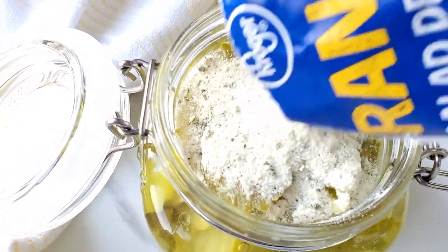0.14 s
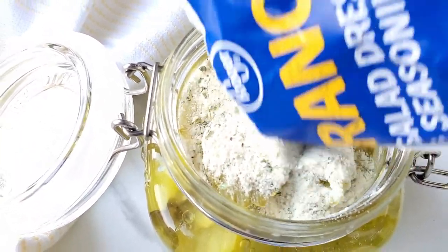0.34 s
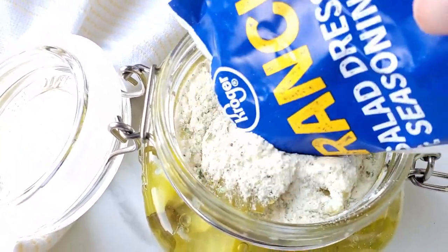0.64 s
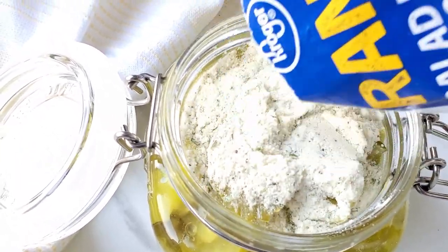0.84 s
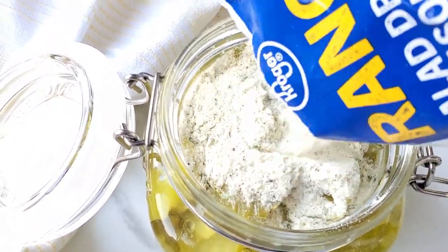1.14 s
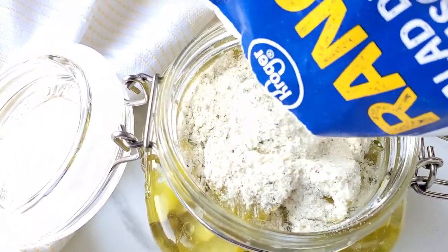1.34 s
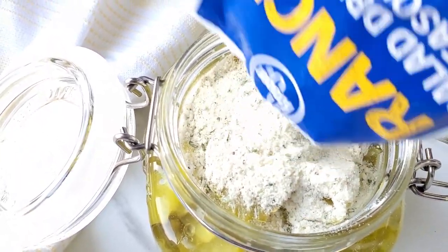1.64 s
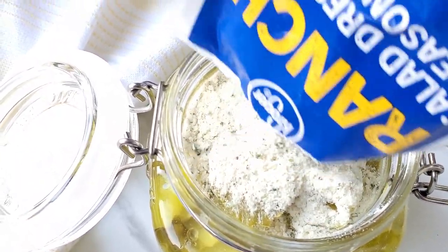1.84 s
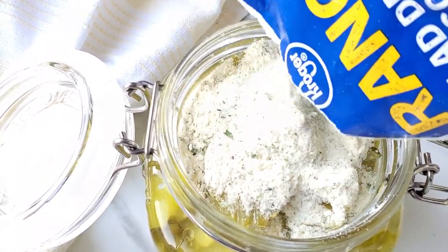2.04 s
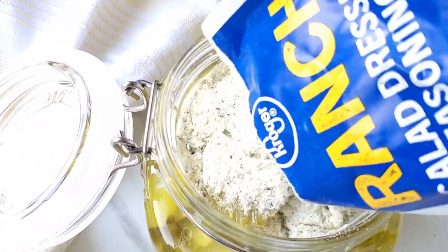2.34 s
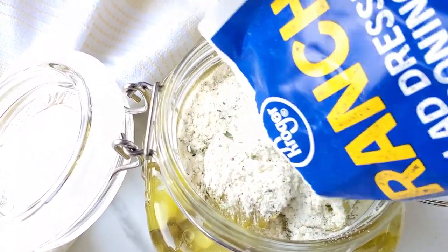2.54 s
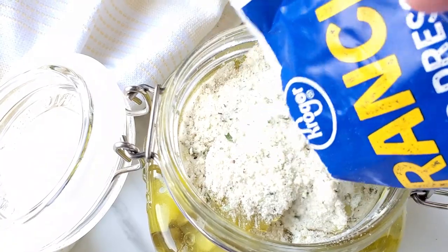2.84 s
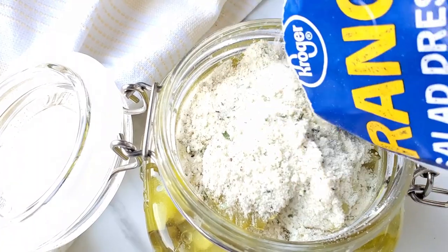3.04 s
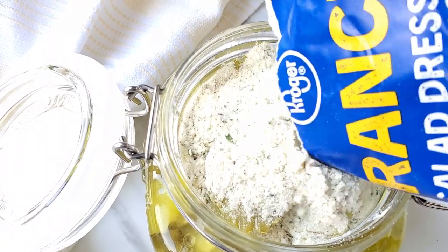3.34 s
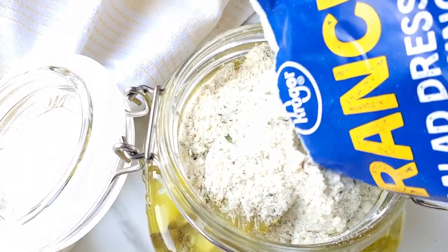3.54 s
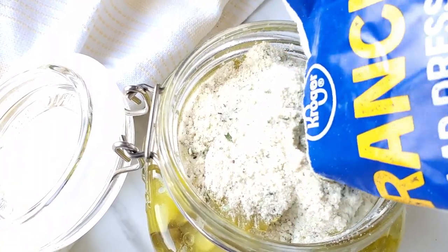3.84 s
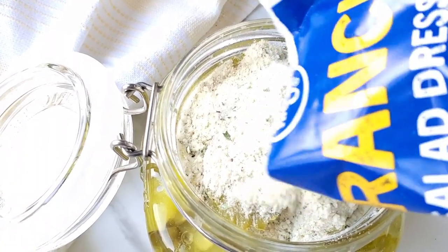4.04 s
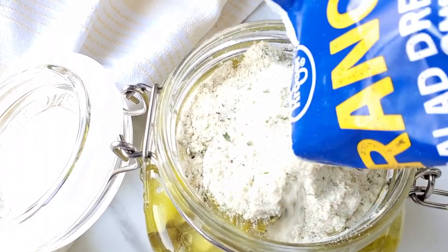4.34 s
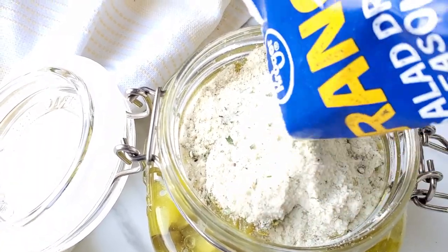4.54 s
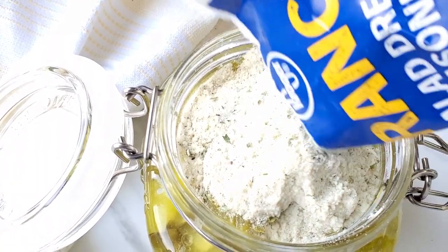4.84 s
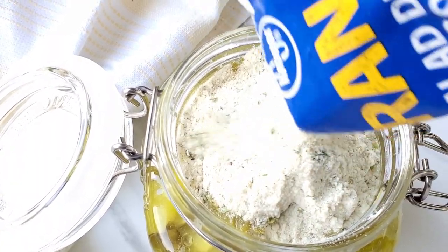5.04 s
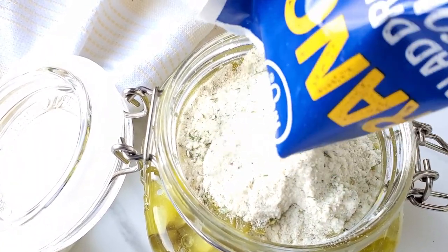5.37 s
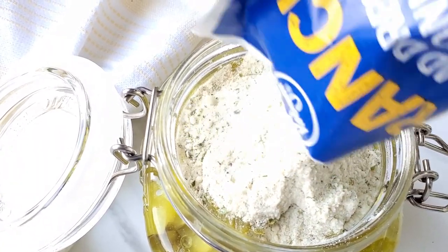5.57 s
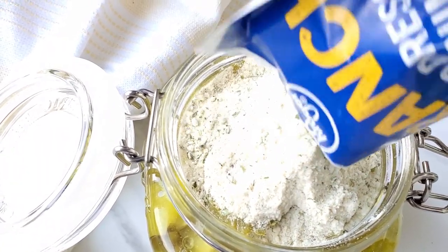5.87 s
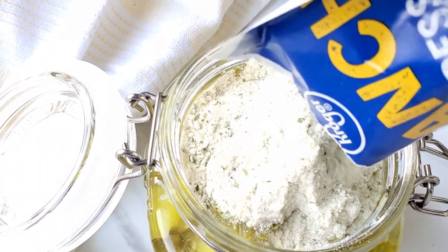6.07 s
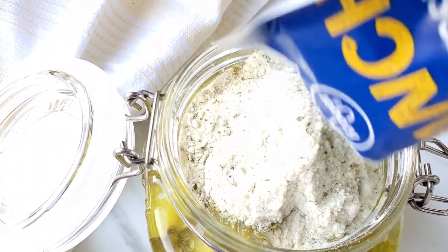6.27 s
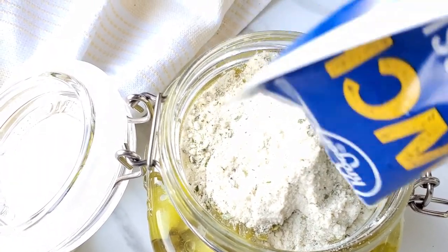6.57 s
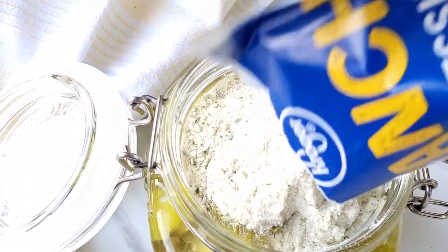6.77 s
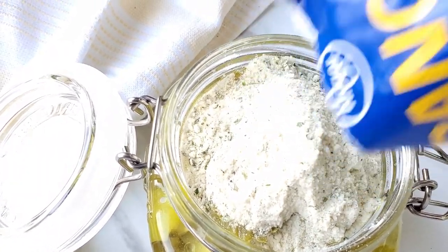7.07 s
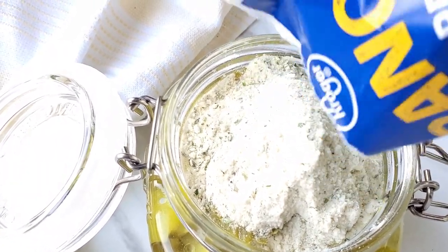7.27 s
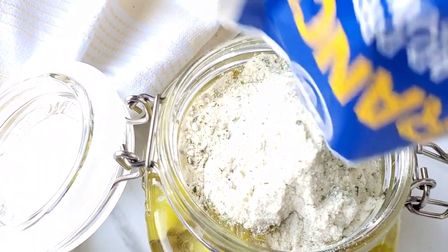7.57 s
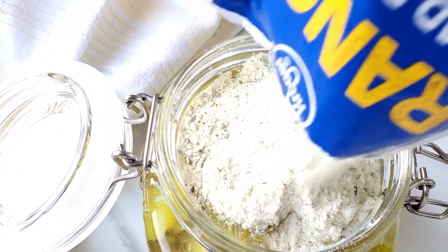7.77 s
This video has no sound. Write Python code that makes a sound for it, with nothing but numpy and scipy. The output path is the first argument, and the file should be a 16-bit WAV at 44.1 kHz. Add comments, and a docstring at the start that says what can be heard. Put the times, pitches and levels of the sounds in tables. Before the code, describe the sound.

A foil packet crinkles and ticks close by as fine dry powder slides out in soft hissing surges, in a quiet kitchen with faint appliance hum.

```python
"""In a small kitchen, a foil seasoning packet is tipped, squeezed and shaken over a glass jar.
Powder slides down the foil in hissing surges of random grains, with coarser herb flakes pinging on top.
The packet walls rub and scuff, and creases snap over with dry ticks: noise bursts through resonances.
A flipping panel adds a hollow thump, and a gripping finger creaks along in runs of knocks.
Appliances hum far behind as wavering sines over shaped noise."""
import sys
import numpy as np
from scipy import signal
from scipy.io import wavfile

SR = 44100
rng = np.random.default_rng(int(sys.argv[2]) if len(sys.argv) > 2 else 0)


def digitize_waveform(pressure):
    """Quantize a signal to 16-bit integers and store it at the path in sys.argv[1].

    Rows of a 2-D input are taken as channels; values are limited to [-1, 1].
    """
    field = np.atleast_2d(pressure).T
    bounded = np.clip(field, -1, 1)
    quanta = np.round(bounded * 32767).astype(np.int16)
    wavfile.write(sys.argv[1], SR, quanta)


N = 348734
TIME = np.arange(N) / SR
NO_DENORMALS = 1e-18   # inaudible offset that keeps decaying filters fast


def from_db(db):
    """Decibels to gain."""
    return 10 ** (np.asarray(db) / 20)


def rms_one(x):
    """Scale to rms 1."""
    return x / np.sqrt(np.mean(x ** 2) + 1e-20)


def at_hz(points, hz):
    """Read a table on a log-frequency axis."""
    f, value = np.transpose(points)
    return np.interp(np.log(hz), np.log(f), value)


def band(x, low_hz, high_hz, order=2):
    """Butterworth band-pass."""
    edges = [low_hz, min(high_hz, SR / 2 - 500)]
    return signal.sosfilt(signal.butter(order, edges, "band", fs=SR, output="sos"), x)


def resonate(x, hz, width_hz):
    """One resonance with gain 1 on top."""
    r = np.exp(-np.pi * width_hz / SR)
    feedback = [1, -2 * r * np.cos(2 * np.pi * hz / SR), r * r]
    return signal.lfilter(np.array([1, 0, -1]) * (1 - r * r) / 2, feedback, x)


def drift(rate):
    """Random wander of rms 1, heading for a new value `rate` times per second."""
    knots = rng.standard_normal(N // 20)
    return rms_one(np.interp(TIME * rate, np.arange(len(knots)), knots))


def pan(lean_db):
    """Left and right gains of mean power 1; a negative lean is louder on the right."""
    return rms_one(from_db([[lean_db / 2], [-lean_db / 2]]))


def grains(per_s, spread_db):
    """Random clicks of very uneven size, rms 1."""
    sizes = from_db(spread_db * np.minimum(rng.exponential(1, N), 4))
    struck = rng.random(N) < per_s / SR
    return rms_one(struck * sizes * rng.choice([-1, 1], N))


def colour(draw, spectrum, likeness, lean, patchy_db, low_hz):
    """Shape an excitation in roughly half-octave stereo bands, each flickering on its own; rms 1."""
    edges = np.geomspace(low_hz, 18000, int(2 * np.log2(18000 / low_hz)) + 1)
    sources = [np.array([draw(), draw()]) for _ in range(2)]
    out = 0
    for k, (low, high) in enumerate(zip(edges, edges[1:])):
        mid, side = band(sources[k % 2], low, high)   # neighbouring bands use different sources
        hz = np.sqrt(low * high)
        alike = np.clip(at_hz(likeness, hz), 0, 1)
        gain = from_db(at_hz(spectrum, hz) + patchy_db * drift(40))
        stereo = np.sqrt(1 + alike) * mid + np.sqrt(1 - alike) * side * [[1], [-1]]
        out = out + gain * pan(at_hz(lean, hz)) * stereo
    return rms_one(out)


def jolt(t, decay_s, scatter, apart):
    """One sharp click, then a dying scatter as the bend runs through the sheet; partly different on each side."""
    noise = rng.standard_normal((3, len(t))) * np.exp(-t / decay_s)
    noise /= np.linalg.norm(noise, axis=1, keepdims=True)
    return scatter * (noise[0] + apart * noise[1:]) - (t == 0)


def add(out, s, wave, level_db, lean_db):
    """Lay a short sound into the mix; its level is that of its energy spread over 10 ms."""
    at = round(s * SR)
    unit = rms_one(wave) * np.sqrt(.01 * SR / wave.shape[1])
    out[:, at:at + wave.shape[1]] += (from_db(level_db) * pan(lean_db) * unit)[:, :N - at]


def swells(rows, rise_db_per_s, fall_db_per_s, rest_db):
    """Gain at every sample: each row (s, length s, dB, swell dB) rises, holds while it swells, and dies away."""
    t = TIME[::16]
    level_db = np.full(len(t), float(rest_db))
    for s, length_s, db, swell_db in rows:
        hold_db = db + swell_db * (np.clip((t - s) / length_s, 0, 1) - .5)
        before_db = rise_db_per_s * np.maximum(s - t, 0)
        after_db = fall_db_per_s * np.maximum(t - s - length_s, 0)
        level_db = np.maximum(level_db, hold_db - before_db - after_db)
    return np.interp(TIME, t, from_db(level_db))


# colour of the still room: (frequency [Hz], relative density [dB per Hz])
ROOM_COLOUR = [(20, -11.5), (45, 1.5), (70, 1), (125, -4), (200, -8.5), (300, -17.5), (430, -18),
               (600, -22.5), (1200, -25), (2400, -38.5), (4000, -39), (8000, -57.5), (16000, -41)]
# how alike the room is in the two channels: (frequency [Hz], likeness [0-1])
ROOM_LIKENESS = [(40, 0.8), (130, 0.86), (300, 0.7), (700, 0.17), (2000, 0), (16000, 0.17)]
# appliance hum: (frequency [Hz], typical level [dB rms])
APPLIANCE_HUM = [(59.3, -60.5), (99.6, -62.5), (112, -66.5), (124, -66), (149, -74), (199, -82.5)]


def room_tone(level_db=-56.5, waver_db=1.0):
    """Low rumble and thin hiss of the room, with the hum of motors wavering in level and phase."""
    room_lean = [(50, 0.55), (1000, 0)]   # (frequency [Hz], left-right [dB])
    air = colour(lambda: rng.standard_normal(N), ROOM_COLOUR, ROOM_LIKENESS, room_lean,
                 patchy_db=1.35, low_hz=20.93)
    hum = 0
    for hz, db in APPLIANCE_HUM:
        strength = from_db(db + waver_db * drift(3.2)) * np.sqrt(2)
        hum = hum + strength * np.sin(2 * np.pi * hz * TIME + 0.77 * drift(1.967))
    return from_db(level_db) * band(air, 34, 20000, order=3) + hum


# each tilt or squeeze slides powder and rubs the walls together; levels before each layer's trim:
# (start [s], length [s], powder level [dB], rubbing level [dB], swell from start to end [dB])
MOVES = [(0.194, 0.019, -56, -57, -2), (0.247, 0.021, -55.5, -54, 9), (0.314, 0.086, -46.5, -52.5, 11),
         (0.512, 0.063, -53.5, -52.5, -3.5), (0.619, 0.17, -52.5, -78, 6), (0.856, 0.036, -51, -75, 4),
         (1.052, 0.15, -47.5, -58.5, 2.5), (1.288, 0.081, -50, -62, -1), (1.689, 0.038, -53, -68, 12.5),
         (1.809, .2, -39, -49.5, 1.5), (2.167, 0.019, -58.5, -65, -2), (2.21, 0.081, -73, -61, -1),
         (2.294, 0.14, -57.5, -51.5, -8), (2.444, .12, -46.5, -50.5, 1), (2.592, .1, -54, -52, -6),
         (2.737, 0.1, -60, -62, -2), (2.899, 0.066, -51, -47, -9), (3.021, 0.24, -60, -58.5, 1),
         (3.273, 0.17, -63.5, -57, 10), (3.496, 0.045, -54, -36.5, 2), (3.567, 0.23, -64.5, -61.5, 5),
         (3.918, 0.083, -66.5, -57.5, -9), (4.022, 0.065, -53.5, -52.5, 3), (4.142, 0.37, -56.5, -56, 0.5),
         (4.571, 0.11, -49.5, -57, 2), (4.722, 0.16, -61.5, -58, 5), (4.907, 0.074, -51, -51.5, 0.5),
         (5.1, 0.082, -58, -57, -10), (5.21, 0.073, -57, -47.5, -11.5), (5.29, 0.18, -58, -73, -5),
         (5.557, 0.058, -72, -58.5, 4), (5.75, 0.14, -55.5, -61, -4), (5.898, 0.057, -47.5, -55, -2),
         (5.993, 0.089, -60, -61, -6), (6.133, 0.049, -62, -65.5, -4), (6.535, 0.167, -67.5, -59, -2),
         (6.8, 0.038, -72, -60.5, -1), (6.975, 0.024, -74, -57.5, 5), (7.036, 0.045, -66, -53.5, -1.5),
         (7.343, 0.051, -60, -48.5, 2), (7.44, 0.014, -66, -46, -16), (7.524, 0.054, -53, -72, 2),
         (7.613, 0.077, -52.5, -72, 13), (7.726, 0.031, -43.5, -54.5, -2.5), (7.88, .03, -69, -76, -2)]


def flow():
    """How much powder slides: it gets going and comes to rest steeply, and trickles while held still."""
    rows = [(s, length, db, swell) for s, length, db, _, swell in MOVES]
    return swells(rows, rise_db_per_s=694, fall_db_per_s=444, rest_db=-75.5)


def friction():
    """How hard the walls rub, down to a faint rustle while the packet is held still."""
    rows = [(s, length, db, swell) for s, length, _, db, swell in MOVES]
    return swells(rows, rise_db_per_s=900, fall_db_per_s=484, rest_db=-72.5)


# the air in the packet's mouth rings lower the wider it gapes: (time [s], centre frequency [Hz])
MOUTH_PITCH = [(0, 3300), (.45, 3240), (.95, 2290), (1.1, 3170), (1.4, 2950), (1.9, 2470), (2.7, 2570),
               (3.2, 2250), (3.9, 2220), (4.3, 2000), (4.8, 1780), (5.3, 1830), (6.5, 1940), (7.0, 2200),
               (7.9, 2080)]


def mouth(x, width_hz):
    """A resonance whose centre follows the opening of the packet; gain 1 on top."""
    s, hz = np.transpose(MOUTH_PITCH)
    turn = np.exp(2j * np.pi * np.cumsum(np.interp(TIME, s, hz)) / SR)
    r = np.exp(-np.pi * width_hz / SR)
    # shift the moving centre down to 0 Hz, smooth there, and shift back
    smoothed = signal.lfilter([1 - r], [1, -r], x / turn + NO_DENORMALS)
    return 2 * np.real(turn * smoothed)


# colour of the sliding powder before the mouth rings: (frequency [Hz], relative density [dB per Hz])
POWDER_COLOUR = [(150, -34.5), (400, -17), (800, -4), (1500, 8), (2200, -5.5), (3000, 2.5), (4500, 8.5),
                 (7000, 8), (10000, 3.5), (13000, 29), (16000, 4.5)]
# how alike powder and foil are in the two channels: (frequency [Hz], likeness [0-1])
LIKENESS = [(60, .95), (300, 0.9), (1000, 0.74), (2200, 0.5), (4500, 0), (9000, 0), (16000, 0.6)]
# the packet lies to the right: (frequency [Hz], left-right [dB])
LEAN = [(150, 20), (400, -3), (700, -23), (1300, -0.5), (2400, -3), (4500, -5.5), (8000, -6.5), (15000, -8)]


def powder(level_db=-4.0):
    """Countless fine grains skid over the foil and stir the air in the mouth; the flow comes in small clumps."""
    hiss = colour(lambda: grains(per_s=14000, spread_db=3.5), POWDER_COLOUR, LIKENESS, LEAN,
                  patchy_db=2.0, low_hz=129.6)
    hiss = hiss + 2.34 * mouth(hiss, width_hz=1200)
    clumps = from_db(level_db + 2.2 * drift(130))
    return flow() * clumps * rms_one(hiss)


def flakes(per_s=200, cycles=52.0, level_db=-11.5, count=36):
    """Coarser herb flakes ride on the powder; each pings a small facet of foil at one of `count` pitches."""
    hits = grains(per_s, spread_db=3.5)
    dealt = rng.integers(0, count, N)
    out = 0
    for k, hz in enumerate(np.geomspace(2500, 9000, count)):
        ping = resonate(hits * (dealt == k) + NO_DENORMALS, hz, hz / cycles)
        out = out + ping / hz ** 0.64 * pan(at_hz(LEAN, hz))   # higher pings are held back
    return flow() * from_db(level_db) * rms_one(out)


# colour of the rubbing foil before its resonances: (frequency [Hz], relative density [dB per Hz])
FOIL_COLOUR = [(150, -28), (400, 4.5), (700, 0.5), (1200, 10.5), (1700, -1), (2300, 7), (3200, 6),
               (4500, -12), (6500, -4.5), (10000, -13.5), (16000, -37)]


def rubbing(level_db=-2.5):
    """Tiny slips and wrinkles tick in the foil and set the mouth ringing."""
    rustle = colour(lambda: grains(per_s=1500, spread_db=2.0), FOIL_COLOUR, LIKENESS, LEAN,
                    patchy_db=4.5, low_hz=140.94)
    rustle = rustle + 1.5 * mouth(rustle, width_hz=200) + .9 * resonate(rustle, 5000, width_hz=1500)
    flutter = from_db(level_db + 1.4 * drift(90))
    return friction() * flutter * rms_one(rustle)


def wrinkles(per_s=70, cycles=3.6, level_db=-11.0, count=12):
    """Small creases give way at random while the walls rub, each with a short ring at one of `count` pitches."""
    hits = grains(per_s, spread_db=3.5)
    dealt = rng.integers(0, count, N)
    ticks = 0
    for k, hz in enumerate(np.geomspace(1500, 5200, count)):
        tick = resonate(hits * (dealt == k) + NO_DENORMALS, hz, hz / cycles)
        ticks = ticks + tick / hz ** 1.2   # higher ticks are held back
    return friction() * from_db(level_db) * rms_one(ticks) * pan(lean_db=-10.5)


def fold_crack(t, decay_s):
    """The bright crack right at a fold."""
    crack = band(jolt(t, decay_s, scatter=1.0, apart=0.74), 2700, 13100)
    return crack + 1.17 * resonate(crack, 5480, width_hz=2000)


# creases snapping over: (time [s], ring level [dB], ring pitch [Hz],
# panel thump re ring [dB], crack re ring [dB])
SNAPS = [(0.1609, -57.5, 2280, -6, -11), (0.269, -58.5, 2950, -10, 5), (0.408, -47.5, 2670, -11, -16),
         (0.53, -41.5, 3550, -24, -5), (0.5342, -45, 2640, -12, -6), (0.5483, -33.5, 1500, -6.5, -22),
         (0.757, -62, 2570, 8, 7), (0.8773, -43, 2160, -4.5, -6), (0.9951, -37.5, 1960, -5, -38),
         (1.1056, -47.5, 1880, -9.5, -12), (1.181, -50, 3030, -20, 1), (1.2843, -52, 1420, -13, -8),
         (1.365, -52.5, 3040, -26, 3), (1.486, -58, 2800, -20, -7.5), (1.536, -62, 3500, -13, 1),
         (1.634, -66.5, 3600, -17, 0), (1.7677, -53.5, 2790, -21, -5), (1.9413, -44, 2180, -24, -7),
         (2.004, -40.5, 2430, -15, -12), (2.3062, -47, 1820, -13, -27), (2.4, -54, 2840, -28, 7),
         (2.487, -47.5, 2810, 1.5, -4), (2.5251, -39, 1780, -13.5, -22), (2.6657, -41, 2200, -10.5, -15),
         (2.8296, -43, 1580, 0.5, -15), (2.8792, -37, 2750, -12, -32), (2.8928, -31.5, 2610, -11, -18),
         (2.9003, -46, 2480, -9, -20), (2.9206, -37, 2260, -11.5, -27), (3.0631, -34.5, 2330, -11, -25),
         (3.1033, -35.5, 2240, -14.5, -26), (3.116, -56, 3400, 0, -3), (3.148, -39.5, 2030, -6.5, -31),
         (3.162, -46, 2130, -15, -20), (3.2081, -53.5, 2170, -8, 5.5), (3.2411, -45.5, 1610, -11, -18),
         (3.361, -40, 2090, -6.5, -31), (3.5032, -28.5, 2800, -3, -9), (3.519, -44.5, 1890, 6, -14),
         (3.5286, -33, 2130, -13, -25), (3.534, -30.5, 2760, -22, -6), (3.5464, -31.5, 1980, -14, -14),
         (3.6836, -53.5, 1730, -1.5, -28), (3.7654, -47, 2100, 1.5, -25), (3.8458, -59, 2430, -6, -5.5),
         (3.9346, -38.5, 1910, -11, -35), (4.0407, -46, 1520, 2.5, -10), (4.0462, -33.5, 2700, -18.5, -20),
         (4.086, -55.5, 1220, 9, -9), (4.7271, -51.5, 1700, -7, -13), (4.8238, -41.5, 1640, -7.5, -19.5),
         (4.9257, -50.5, 1710, -5, -5), (5.1013, -34, 2040, 1, -1.5), (5.1076, -31, 1880, -6.5, -22),
         (5.1219, -43, 1460, -7, -20), (5.2305, -37, 2050, -4, -30), (5.3011, -33.5, 1950, -5, -8.5),
         (5.5609, -55.5, 2690, -16, -7.5), (5.5886, -50, 1550, -10, -22), (5.691, -47, 1530, -7.5, -18.5),
         (5.758, -53, 1690, -2, -26), (6.0152, -43.5, 1620, -2.5, -22), (6.122, -55.5, 1660, 7, -4),
         (6.3204, -56.5, 1600, -2, -4), (6.3311, -52, 2200, -8, -4), (6.36, -62, 1800, 2, 7),
         (6.3705, -50, 1670, -8, -22), (6.5427, -40.5, 1560, -0.5, -8.5), (6.5708, -55.5, 2230, 6, -1),
         (6.587, -56, 2020, 7, -4), (6.6211, -54.5, 2650, 5.5, -12), (6.677, -55.5, 1900, 2, -3),
         (6.8171, -45.5, 1520, -3, -29), (7.0285, -52.5, 2230, -9, -14), (7.0554, -49, 1840, -4, -24),
         (7.35, -51.5, 2200, -2, -5), (7.3737, -44, 1650, -6.5, -15), (7.387, -56, 2300, -13, -6),
         (7.3985, -50, 4280, -8, -27), (7.434, -43, 1490, -1, -17), (7.4393, -36.5, 1300, -9.5, -9)]
SNAP_DECAY_S, SNAP_REFERENCE_DB = 0.0017, -29.5   # base decay of a snap at the reference level
SNAP_DOUBLING_DB = 31   # a snap this much weaker takes twice as long to give way


def snaps():
    """Each crease rings its facet, cracks at the fold and pushes air with the panel around it."""
    out, t = np.zeros((2, N)), np.arange(SR // 20) / SR
    for s, level_db, hz, thump, crack in SNAPS:
        slowness = 2 ** ((SNAP_REFERENCE_DB - level_db) / SNAP_DOUBLING_DB)
        decay_s = SNAP_DECAY_S * slowness
        scatter = 2.7 * slowness   # a slow crease gives way in many small steps
        facet = band(jolt(t, decay_s * 1.13, scatter, apart=1.0), hz * 0.47, hz * 1.585, order=3)
        facet = facet + 1.38 * resonate(facet, hz, width_hz=440) + 0.84 * resonate(facet, 2320, width_hz=110)
        own_hz = hz * rng.uniform(0.43, 1.562)   # every facet has one sharper note of its own
        facet = facet + 1.97 * resonate(facet, own_hz, width_hz=220)
        panel = band(jolt(t, decay_s * 1.35, 0.3 * scatter, apart=0.2), 243, 880)
        panel = panel + 1.5 * resonate(panel, 711, width_hz=81)   # the hollow of the packet
        add(out, s, facet, level_db, lean_db=-5.5)
        add(out, s, panel, level_db + thump, lean_db=-11.5)
        add(out, s, fold_crack(t, decay_s), level_db + crack, lean_db=-9.0)
    return out


# soft scuffs of the packet against fingers and powder heap:
# (time of the middle [s], half length [s], level at the middle [dB], pitch [Hz])
SCUFFS = [(0.565, 0.011, -46.5, 830), (1.821, 0.0075, -45, 372), (2.285, 0.031, -52.5, 574),
          (3.05, 0.25, -61, 573), (3.22, 0.028, -61, 547), (3.271, 0.0051, -44.5, 750),
          (3.508, 0.0026, -32, 796), (3.418, 0.042, -61, 510), (3.688, 0.0077, -48.5, 480),
          (4.637, 0.048, -56.5, 811), (6.59, 0.045, -58, 780), (7.045, 0.028, -62, 520),
          (7.374, 0.042, -59.5, 960)]


def scuffs(lean_db=-9.0):
    """Dull, grainy swells of friction."""
    slip_grains, out = grains(per_s=1300, spread_db=3.5), 0
    for s, half_s, level_db, hz in SCUFFS:
        swell = np.exp(-np.minimum(((TIME - s) / half_s) ** 2, 20))
        dull = rms_one(band(slip_grains, hz * 0.58, hz * 1.09))
        out = out + from_db(level_db) * swell * dull
    return out * pan(lean_db)


# a finger sticks and slips along the packet; level and pitch are centres, before spread and trims:
# (start [s], length [s], slip rate [1/s], thump level [dB], ring re thump [dB], crack re thump [dB],
# hollow pitch [Hz])
CREAKS = [(4.476, .107, 66, -52, -12, -22, 750), (5.0112, .074, 102, -37.5, -10, -21.5, 770),
          (5.1162, .038, 65, -35, -1, -20, 714), (5.1983, .062, 100, -40, -5.5, -15.5, 720)]
SLIP_JITTER_S = .0007   # slips come a little early or late
SLIP_SPREAD_DB, SLIP_PITCH_SPREAD = 1.5, 0.13   # no two slips are alike; pitch spread is a log ratio


def slips():
    """Every creak as a nearly regular run of knocks."""
    rows = []
    for s, length_s, per_s, db, ring, crack, hz in CREAKS:
        for after_s in np.arange(0, length_s, 1 / per_s):
            late, loud, sharp = rng.standard_normal(3)
            slip_s = s + after_s + SLIP_JITTER_S * late
            slip_hz = hz * np.exp(SLIP_PITCH_SPREAD * sharp)
            rows.append((slip_s, db + SLIP_SPREAD_DB * loud, ring, crack, slip_hz))
    return rows


# single taps of a finger on the taut packet, before the trims in knocks():
# (time [s], thump level [dB], ring re thump [dB], crack re thump [dB])
TAPS = [(5.355, -47.5, 3.5, -12), (5.3904, -46, -1.5, -8.5), (5.464, -38, -1, -12.5),
        (5.8951, -40, -1, -19), (5.911, -34, 3, -14), (5.9451, -34, 2.5, -12)]
TAP_HOLLOW_HZ = 718


def knocks(thump_db=1.0, ring_db=-4.5, crack_db=-1.5):
    """A finger lets the whole wall jump: one in-and-out swing of air, a hollow ring and a short rattle of foil."""
    out, t = np.zeros((2, N)), np.arange(SR // 20) / SR
    taps = [(*row, TAP_HOLLOW_HZ) for row in TAPS]
    for s, level_db, ring, crack, hz in taps + slips():
        swing = band(jolt(t, decay_s=0.0038, scatter=0.49, apart=0.49), hz * 0.21, hz * 1.25, order=4)
        swing = swing + 1.07 * resonate(swing, hz, width_hz=80) + 0.87 * resonate(swing, 356, width_hz=160)
        rattle = band(jolt(t, decay_s=0.0049, scatter=1.0, apart=1.0), 1160, 3360, order=3)
        add(out, s, swing, level_db + thump_db, lean_db=-11.5)
        add(out, s, rattle, level_db + ring + ring_db, lean_db=-5.5)
        add(out, s, fold_crack(t, decay_s=0.0027), level_db + crack + crack_db, lean_db=-8.0)
    return out


# the packet shifts over the jar, so its sound reaches the left microphone more or less late:
# (time [s], lag [s])
LEFT_LAG = [(0, 0.00039), (2.6, 0.00039), (3.2, 0.00045), (4.2, 0.00045), (5.2, 0.0004), (5.8, 0.000506),
            (7.3, 0.00049), (7.9, 0.0004)]


def left_late(x, dip_hz=1250, dip_width_hz=600, dip=0.23):
    """Sound from the right reaches the left microphone later; the right is a little hollow in the middle range."""
    left, right = x
    lag_s = np.interp(TIME, *np.transpose(LEFT_LAG))
    late_left = np.interp(TIME - lag_s, TIME, left)
    return np.array([late_left, right - dip * resonate(right, dip_hz, dip_width_hz)])


def kitchen(x, early_db=-14.5, tail_db=-19.0, early_s=0.011, t60_s=.2):
    """Quick echoes off jar and counter, then a short tail with a treble part that lingers longer."""
    t = np.arange(SR // 2) / SR
    noise = rng.standard_normal((3, 2, len(t)))
    early = band(noise[0], 290, 11700) * np.exp(-t / early_s) * (t > .002)
    tail = band(noise[1], 170, 6000) * from_db(-60 * t / t60_s)
    tail += .5 * band(noise[2], 4000, 20000) * from_db(-60 * t / (1.6 * t60_s))
    tail *= np.clip(t / 0.014, 0, 1)   # the tail fades in
    echoes = from_db(early_db) * rms_one(early) + from_db(tail_db) * rms_one(tail)
    crossed = .75 * x + .25 * x[::-1]   # each side hears some of the other
    return signal.fftconvolve(crossed, echoes / np.sqrt(len(t)), axes=1)[:, :N]


def scene():
    """The packet close by on the right, in the quiet kitchen."""
    sliding = powder() + flakes()
    foil = rubbing() + wrinkles() + snaps() + scuffs() + knocks()
    packet = left_late(sliding + foil)
    return room_tone() + packet + kitchen(packet)


def record(dry, cutoff_hz=16100):
    """The top is cut steeply."""
    return signal.sosfilt(signal.ellip(12, .1, 80, cutoff_hz, fs=SR, output="sos"), dry)


dry = scene()
out = record(dry)
digitize_waveform(out)
```